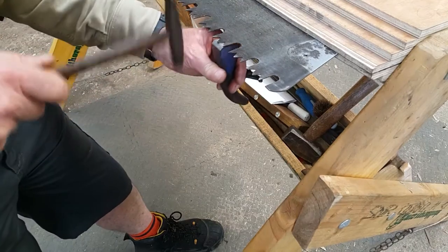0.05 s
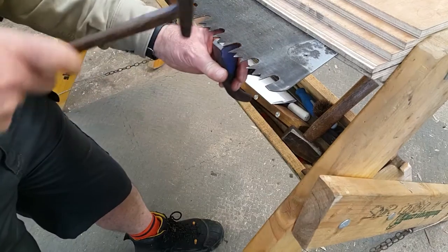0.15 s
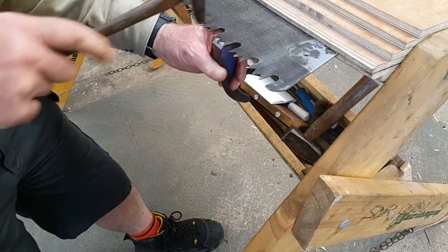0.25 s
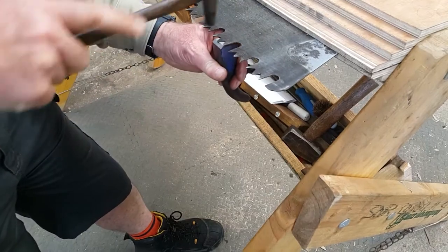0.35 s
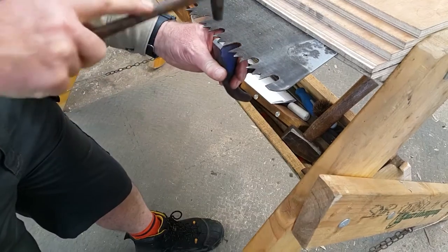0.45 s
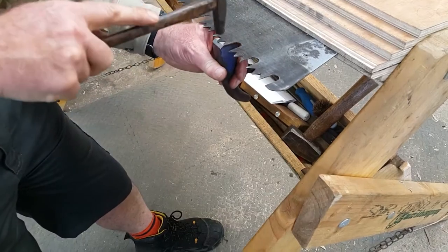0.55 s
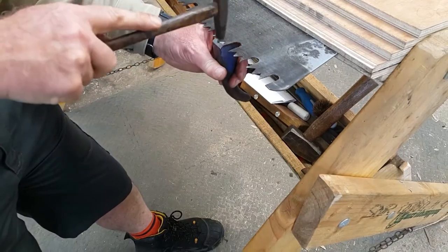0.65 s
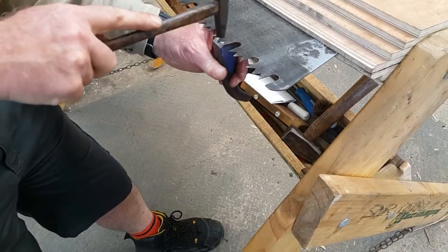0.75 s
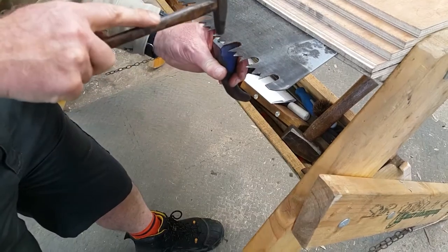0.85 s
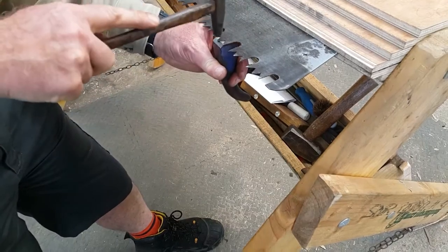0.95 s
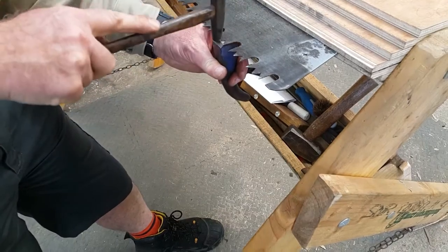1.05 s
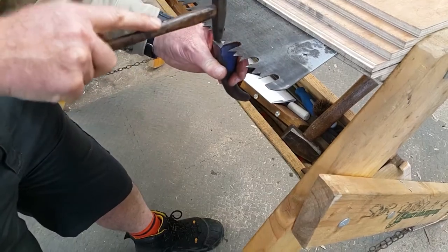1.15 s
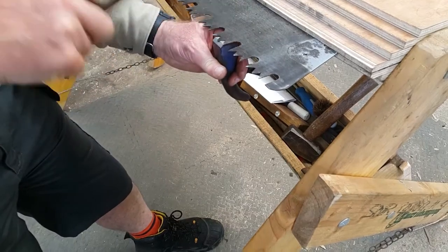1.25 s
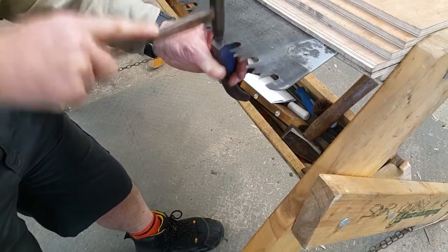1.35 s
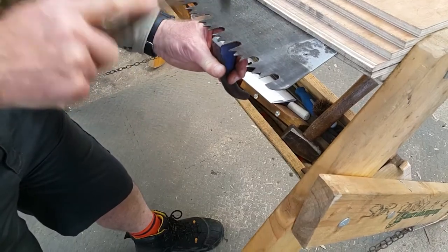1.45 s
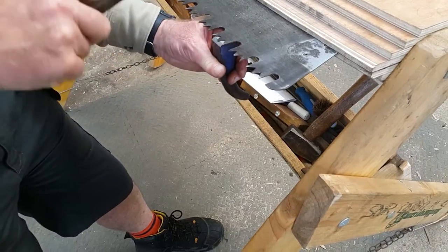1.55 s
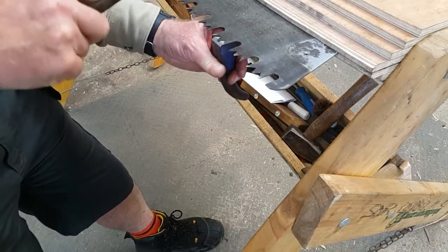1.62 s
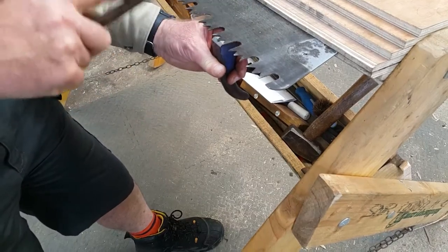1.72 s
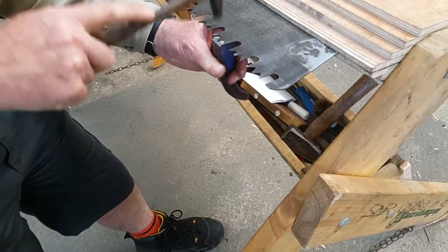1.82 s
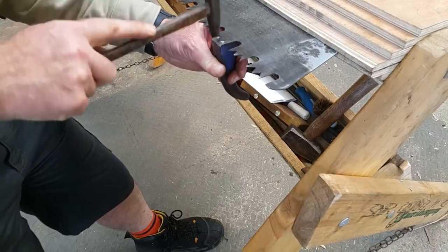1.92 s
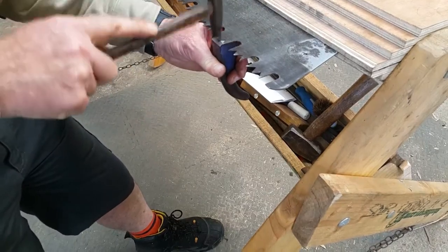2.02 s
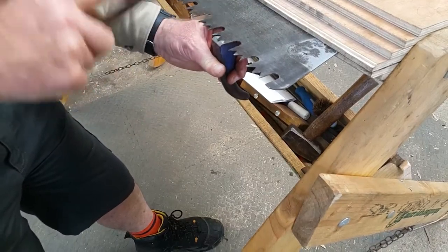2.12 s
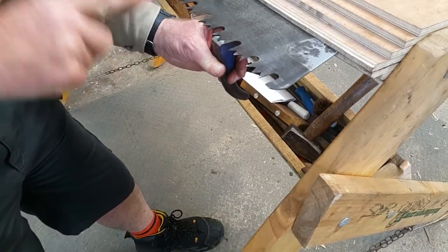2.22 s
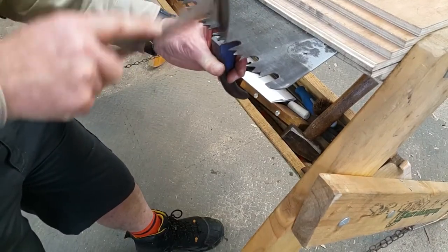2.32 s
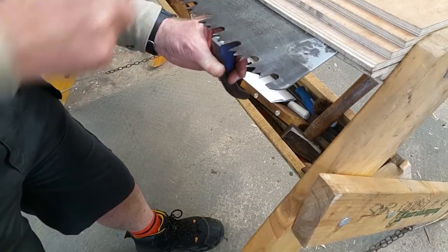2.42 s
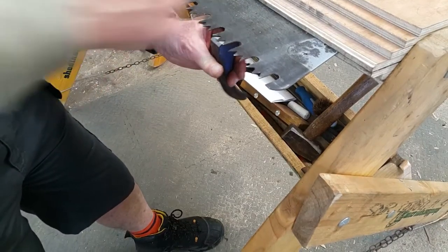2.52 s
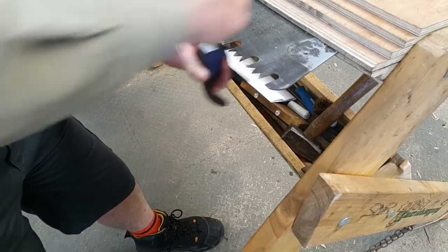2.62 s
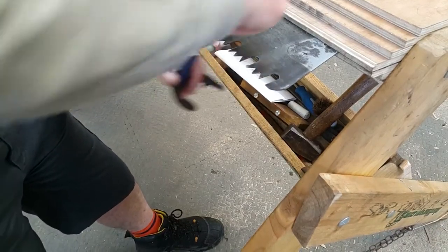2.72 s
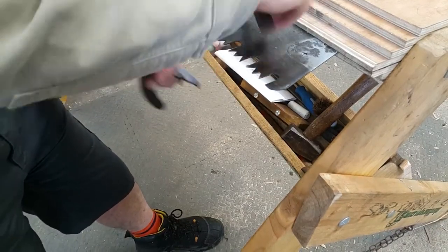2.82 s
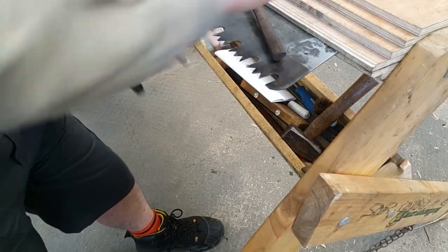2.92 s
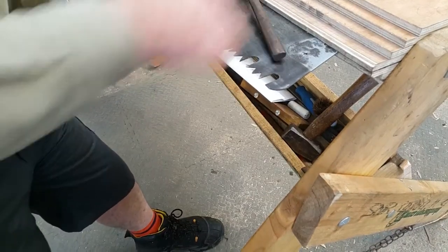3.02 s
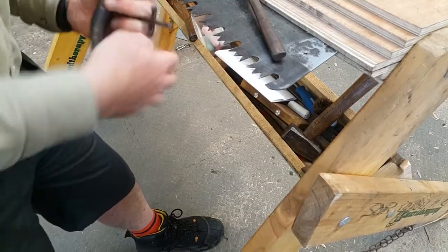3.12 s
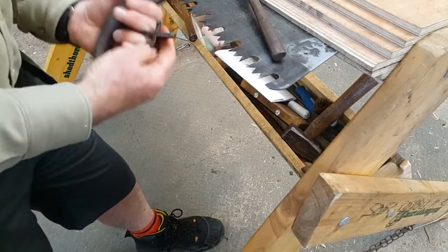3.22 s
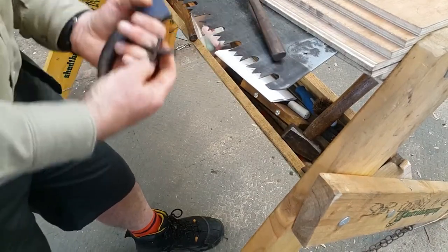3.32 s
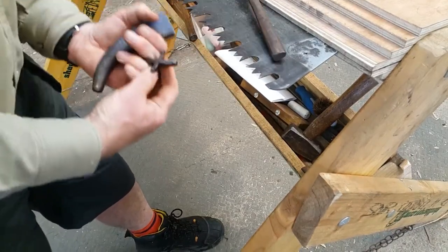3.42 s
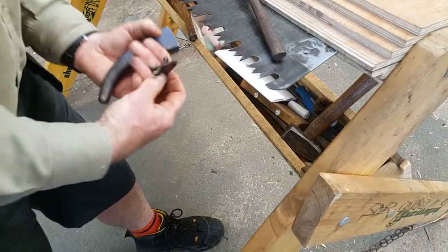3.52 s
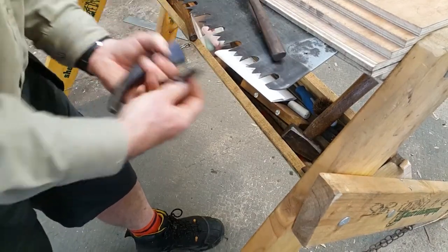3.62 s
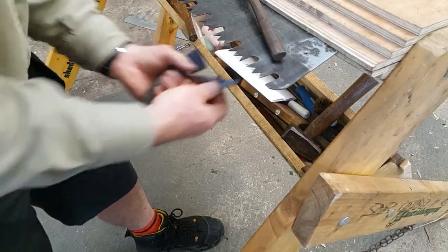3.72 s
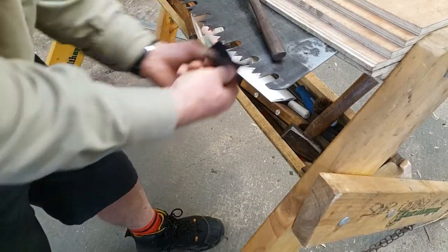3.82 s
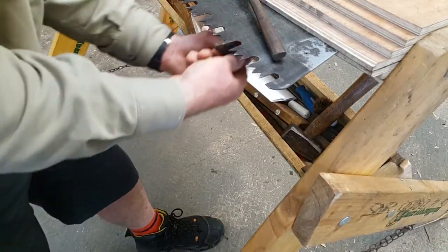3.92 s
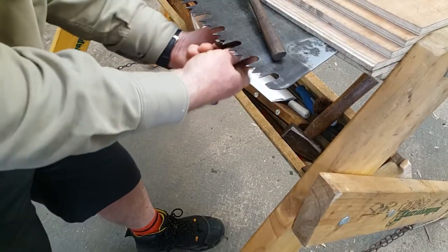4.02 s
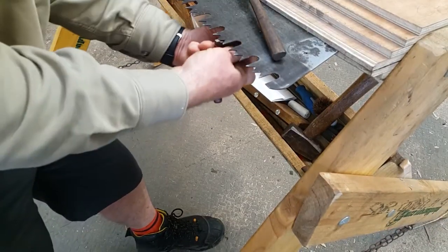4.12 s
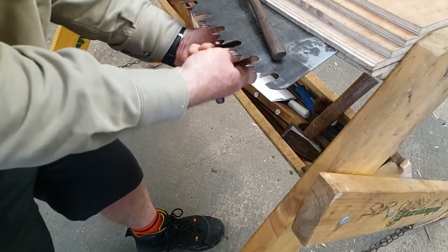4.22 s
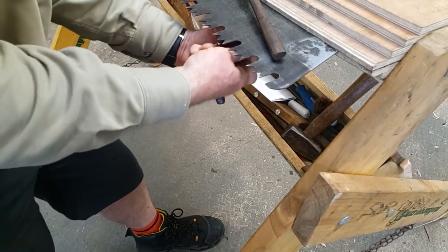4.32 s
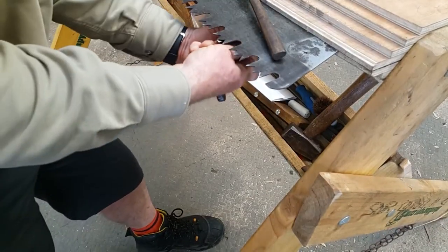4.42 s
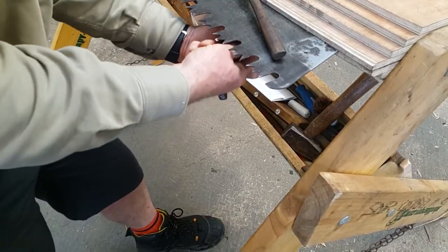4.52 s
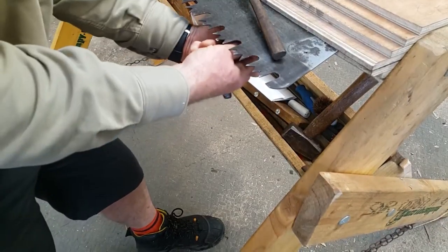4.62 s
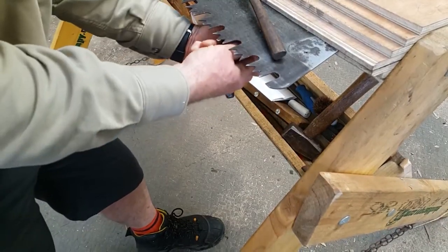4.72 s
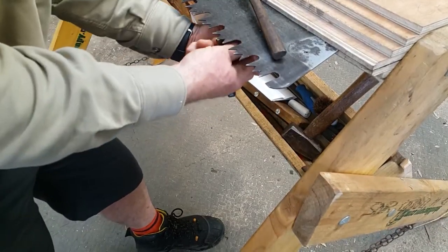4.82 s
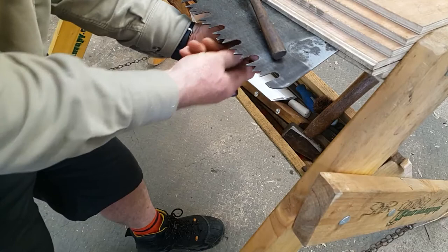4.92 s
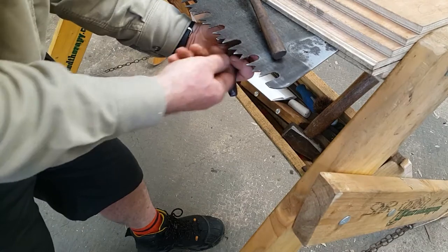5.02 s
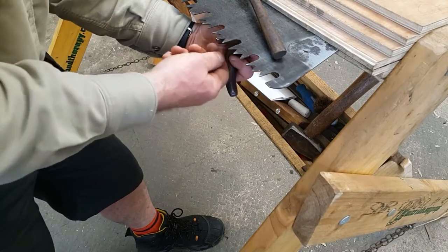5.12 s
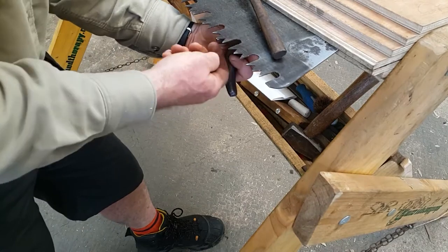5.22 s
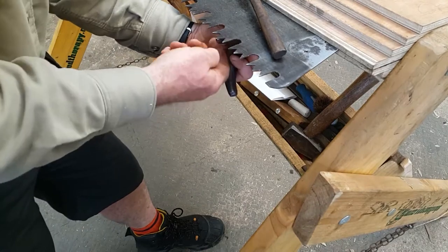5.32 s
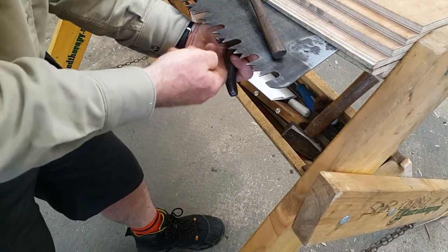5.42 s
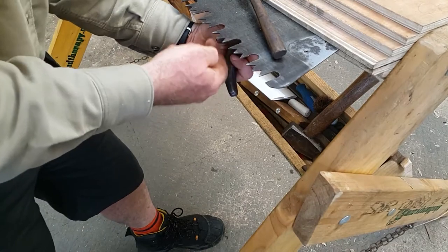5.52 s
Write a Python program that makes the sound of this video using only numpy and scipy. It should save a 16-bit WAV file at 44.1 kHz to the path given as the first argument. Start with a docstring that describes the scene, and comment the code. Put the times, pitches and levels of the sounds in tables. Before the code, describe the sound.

A hammer gives a saw tooth two light taps and two hard ringing blows, then is laid down with a metallic clatter.

```python
"""Setting saw teeth in a workshop

Close to a small anvil, on a phone's two microphones: twice a light aiming tap, then a hard hammer blow.
Steel cracks, the anvil, blade and bench ring, the room answers, and gain control ducks each hard blow.
The hammer is laid down on the blade and a small steel gauge clicks against a tooth; sleeves rustle."""
import sys
import numpy as np
from scipy import signal
from scipy.fft import rfft, irfft, next_fast_len
from scipy.io import wavfile
from scipy.ndimage import uniform_filter1d, minimum_filter1d

SR = 44100
rng = np.random.default_rng(int(sys.argv[2]) if len(sys.argv) > 2 else 0)


def waveform_to_disk(signal):
    """Save audio, clipped to [-1, 1], as 16-bit WAV at the path in sys.argv[1]."""
    frames = np.transpose(np.atleast_2d(signal))
    scaled = np.clip(frames, -1, 1) * 32767
    samples = np.round(scaled).astype(np.int16)
    wavfile.write(sys.argv[1], SR, samples)


N = 245107
T = np.arange(N) / SR
SIDES = np.array([[1], [-1]])  # left and right microphone


# taps and blows at the anvil: (time [s], force [dB], firmness of the tooth's seat [dB])
HAMMER_BLOWS = [(1.1673, 1.5, 1), (1.5117, 33.5, 8), (2.1192, -6, 2), (2.4257, 36.5, -4)]
# a blow's tone hardens with force: (frequency [Hz], level at 0 dB force [dB], growth [dB/dB])
HAMMER_TONE = [(450, 14.5, -0.4077), (1507, 3.5, -0.17), (3517, -1, 0.04), (6030, -2, 0.1478),
               (11000, -5.5, 0.2536)]
# ring of anvil, blade and bench, a row each: (level at 0 dB force [dB], growth [dB/dB])
HAMMER_RINGS = [(-51.5, 1.3853), (-41.5, 0.7888), (-27.5, 0.434)]
# a firmly seated tooth passes the blow on as a thump: (frequency [Hz], lift [dB/dB of seat])
SEAT_THUMP = [(160, 1), (900, 0)]
def hammer_blows(plate, shimmer_db=-5.0):
    """Hammer on tooth: force brightens it and brings out the anvil; a firm seat adds thump and ring."""
    out = np.zeros((2, N))
    for s, force_db, seat_db in HAMMER_BLOWS:
        tone = [(hz, db + growth * force_db) for hz, db, growth in HAMMER_TONE]
        crack = tilt(contact(force_db, tone, t60=0.0097), SEAT_THUMP, seat_db)
        anvil_db, blade_db, bench_db = (db + growth * force_db for db, growth in HAMMER_RINGS)
        rings_db = [anvil_db + seat_db, blade_db, bench_db]
        add(out, s, strike(s, crack, rings_db, undb(shimmer_db) * plate, wet_db=0.07, ring_wet_db=-16.5))
    return out


# hammer clatter and gauge clicks on the saw: (time [s], force [dB], dullness [dB], sharpness [dB])
TOOL_KNOCKS = [(0.2286, -14.5, 19, 7), (2.8481, 16.5, 11.5, 6), (2.861, 7.5, 11, 0), (2.8772, 8.5, 16.5, 0),
               (2.9530, 8.5, 16.5, -2.5), (3.036, 11, 5, -5.5), (4.5950, -2.5, 0, 0),
               (4.7660, -19, 18.5, 7)]
# tone of a knock: (frequency [Hz], level [dB])
TOOL_TONE = [(200, -4), (480, 1.5), (750, -1.5), (1500, 0), (3200, -1), (5600, 6), (11000, 1)]
# ring relative to a knock's force: (anvil [dB], blade [dB], bench [dB])
TOOL_RINGS = [-62, -50, -59.5]
# a softer contact leans towards the bass: (frequency [Hz], lift [dB/dB of dullness])
DULL_BASS = [(500, 1), (1500, 0.52), (3600, 0)]
# a sharp edge adds a high tick: (frequency [Hz], lift [dB/dB of sharpness])
EDGE_TICK = [(6200, 0), (11000, 1)]
def tool_knocks(plate, shimmer_db=-14):
    """Tools knock on the saw: mostly crack, with a little ring; a dull knock shakes the bench more."""
    out = np.zeros((2, N))
    for s, force_db, dull_db, edge_db in TOOL_KNOCKS:
        crack = tilt(contact(force_db, TOOL_TONE, t60=0.013), DULL_BASS, dull_db)
        crack = tilt(crack, EDGE_TICK, edge_db)
        anvil_db, blade_db, bench_db = force_db + np.array(TOOL_RINGS)
        rings_db = [anvil_db, blade_db, bench_db + dull_db]
        add(out, s, strike(s, crack, rings_db, undb(shimmer_db) * plate, wet_db=-2.5, ring_wet_db=-2.5))
    return out


# steel meeting steel, heard close: (frequency [Hz], level [dB])
STEEL_SPECTRUM = [(40, -34), (130, -17.5), (220, -9.5), (330, -6.5), (700, 0.5), (1200, 5), (2000, 5),
                  (3300, 3), (5500, 3.5), (7800, 1.5), (9000, -8.5), (11500, -9), (13500, -22),
                  (16000, -21.5)]
def contact(force_db, tone, t60, rise_t60=0.012, evenness=0.22, size=4096):
    """The crack of steel on steel: a burst that dies quickly, spread unevenly over all pitches."""
    t = T[:size]
    spectrum = rfft(diffuse(size) * fade(t, t60) * (1 - fade(t, rise_t60)))
    burst = irfft(spectrum / np.abs(spectrum) ** evenness) * fade(t, 3 * t60)
    burst /= np.sqrt(np.sum(burst ** 2, axis=1, keepdims=True))
    return undb(force_db) * colour(colour(burst, STEEL_SPECTRUM), tone)


# modes of the anvil, the saw blade and the bench: (frequency [Hz], level [dB], t60 [s])
ANVIL_MODES = [(3461, -18, .3), (4047, -15, .3), (4254, -9, .33), (4391, -5, .34), (4406, -1, .17),
               (5180, -12, .27), (5437, -12, .3), (6114, -14, .28), (7323, -15, .25), (7996, -10, .42),
               (8032, -10, .42), (10130, -24, .3), (11050, -12, .3)]
BLADE_MODES = [(1010, -17, 1.4), (1198, -1, 5.0), (1364, -3, .6), (1779, -2, .5), (2045, -3, .35),
               (2428, -9, .5), (2858, -6, .4), (2995, -6, .4)]
BENCH_MODES = [(287, -6, .3), (303, -6, .28), (330, -6, .25), (393, -3, .36), (432, -3, .34), (470, -7, .3),
               (548, -8, .22), (587, -12, .33), (651, -9, .22), (885, -10, .42), (921, -6, .46),
               (961, -6, .52), (1028, -13, .45), (1120, -10, .3)]
# thin steel sends little bass straight to the microphones: (frequency [Hz], level [dB])
DIRECT_PATH = [(120, -38), (400, 1.5), (1000, -5), (3500, 1.5), (6000, 5.5), (12000, -1)]
def strike(s, crack, rings_db, plate, wet_db, ring_wet_db):
    """One contact from close by: its crack, the ring of anvil, blade and bench, then the room."""
    anvil, blade, bench = undb(rings_db)
    close = blade * ring(BLADE_MODES, SR) * grip(s, SR)
    add(close, 0, anvil * ring(ANVIL_MODES, SR // 2) + bench * ring(BENCH_MODES, SR // 2))
    into_room = undb(ring_wet_db) * close
    add(into_room, 0, undb(wet_db) * crack)
    direct = colour(crack, DIRECT_PATH)
    add(close, 0, direct)
    add(close, 0, undb(wet_db) * signal.fftconvolve(direct, echoes(), axes=1))
    add(close, 0, signal.fftconvolve(crack, plate, axes=1))
    sound = signal.fftconvolve(into_room, room(), axes=1)
    add(sound, 0, close)
    return sound


def ring(modes, size):
    """Struck modes die away; the higher ones reach the two microphones out of step."""
    t, out = T[:size], 0
    for hz, db, t60 in modes:
        skew = SIDES * min(hz / 2000, 1) * rng.uniform(-0.35, 1) * np.pi / 2
        phase = 2 * np.pi * (hz * t + rng.random()) + skew
        out = out + undb(db) * fade(t, t60) * np.sin(phase)
    return out * (1 - fade(t, 0.018))


def shimmer(count=320, t60=0.27, spread_db=4):
    """The blade's many high bending modes, evenly dense as in any thin plate."""
    modes = [(1500 + 10500 * pitch, spread_db * (2 * level - 1), t60 * (.6 + .8 * decay))
             for pitch, level, decay in rng.random((count, 3))]
    return unit_energy(ring(modes, SR // 2))


# the blade's ring sinks once and swells back: (time [s], level [dB])
BLADE_SWELL = [(3.1, -1.5), (3.32, -6.5), (3.42, -1), (3.68, 1), (3.9, -1.5)]
def grip(s, size, damping_db_per_s=79, let_go_s=3.25, take_hold_s=3.91):
    """Gain of the blade's ring from time s: the hand damps it, except while it has let go."""
    t = s + T[:size]
    held_s = t - np.clip(t, let_go_s, take_hold_s)
    swell_db = np.interp(t, *np.transpose(BLADE_SWELL))
    return undb(swell_db - damping_db_per_s * (held_s - held_s[0]))


# fingers and tools on the blade: (time [s], force [dB], dullness [dB], nominal t60 [s])
LIGHT_TOUCHES = [(0.1490, -39.5, 26.5, 0.012), (0.272, -24.5, 17, 0.023), (4.151, -33, 27.5, 0.14),
                 (4.176, -34, 30.5, 0.062), (4.341, -37, 14.5, 0.06), (4.5815, -26, 26.5, 0.027),
                 (4.9, -32.5, 9, 0.045)]
# tone of a touch: (frequency [Hz], level [dB])
TICK_TONE = [(450, -1.5), (1500, -2.5), (3600, -1.5), (8500, 7), (12000, 6)]
def touches():
    """Ticks and scuffs too light to ring the blade, each with the room behind it."""
    out = np.zeros((2, N))
    for s, force_db, dull_db, t60 in LIGHT_TOUCHES:
        tick = tilt(contact(force_db, TICK_TONE, t60), DULL_BASS, dull_db)
        add(out, s, colour(tick, DIRECT_PATH))
        add(out, s, signal.fftconvolve(tick, room(), axes=1))
    return out


# the two microphones differ most in the treble: (frequency [Hz], left minus right [dB])
MIC_BALANCE = [(120, 1.5), (300, 1), (1200, -1.5), (3000, -0.5), (4500, -4.5), (6500, -3), (8500, 10.5),
               (11500, 8.5), (14000, 3.5)]
def metalwork():
    """Blows, knocks and touches, as each microphone colours them."""
    plate = shimmer()
    steel = hammer_blows(plate) + tool_knocks(plate) + touches()
    return np.array([tilt(channel, MIC_BALANCE, side / 2) for channel, side in zip(steel, (1, -1))])


# movements at the bench: (time [s], half-width [s], level [dB])
SLEEVE_SWELLS = [(0.45, 0.13, -57.5), (0.78, 0.29, -68.5), (3.653, 0.059, -60), (3.924, 0.23, -61.5)]
def sleeves(grain_db=1.0):
    """Soft swells of grainy hiss as cloth and skin slide."""
    swell = sum(undb(db) * np.exp(-((T - s) / width) ** 2) for s, width, db in SLEEVE_SWELLS)
    knots = np.arange(0, N, SR // 200)
    grain = undb(grain_db * np.interp(np.arange(N), knots, rng.standard_normal(len(knots))))
    cloth_tone = [(100, 0), (500, 4.0), (1500, -4.0), (4000, -1.5), (7000, 7.0), (9500, -7), (15000, -15)]
    hiss = colour(diffuse(N), cloth_tone)
    return swell * grain * hiss / hiss.std()


# off the bench top, the floor and the near wall: (delay [s], relative level [dB])
NEAR_ECHOES = [(.0048, -4.5), (0.014, -21.5), (.026, -21.5)]
def echoes(size=2048):
    """Single reflections, each reaching the two microphones at slightly different moments."""
    out = np.zeros((2, size))
    for delay, db in NEAR_ECHOES:
        arrival = (SR * (delay + rng.uniform(0, .0004, 2))).astype(int)
        out[[0, 1], arrival] += undb(db)
    return out


# reverberation of the workshop's walls: (frequency [Hz], t60 [s])
WALL_DECAY = [(100, 0.28), (400, 0.41), (1200, 0.34), (3000, 0.45), (6000, 0.37), (10000, 0.25),
              (15000, 0.15)]
def room(near_db=-5, near_t60=0.014, walls_db=-1, build_t60=0.048, far_db=-23, far_t60=0.73, size=SR):
    """Echo pattern of one spot: bench and floor first, then the walls, then a faint long tail."""
    t, hz = T[:size], np.fft.rfftfreq(size, 1 / SR)
    noise, walls = rfft(diffuse(size)), 0
    for band_hz, t60 in WALL_DECAY:
        band = curve([(f, f == band_hz) for f, _ in WALL_DECAY], hz)
        walls = walls + irfft(noise * band, size) * fade(t, t60)
    walls = walls * (1 - fade(t, build_t60))
    near = diffuse(size) * fade(t, near_t60) * (t > .003)
    far = colour(diffuse(size), [(2000, -5.5), (6000, -8.0), (11000, -19)]) * fade(t, far_t60)
    return sum(undb(db) * unit_energy(x) for db, x in [(near_db, near), (walls_db, walls), (far_db, far)])


# room tone all around the microphones: (frequency [Hz], relative level [dB])
AIR_SPECTRUM = [(30, -21), (90, -13.5), (200, -13.5), (280, -8), (600, -13), (655, -1.5), (710, -13),
                (1000, -18), (3700, -23), (4800, -20), (5750, -8.5), (8000, -25), (11000, -26.5),
                (16000, -29)]
def room_tone(level_db=-60.5):
    """The steady air of the workshop: a low murmur with a hum and a band of hiss."""
    air = colour(diffuse(N, alike_hz=600, likeness=0.17), AIR_SPECTRUM)
    return undb(level_db) * air / air.std()


def diffuse(size, alike_hz=750, likeness=1.0):
    """White noise at two closely spaced microphones: alike in the bass, unrelated in the treble."""
    mid, side = rfft(rng.standard_normal((2, size)))
    alike = likeness / (1 + (np.fft.rfftfreq(size, 1 / SR) / alike_hz) ** 2)
    return irfft(mid * np.sqrt(1 + alike) + SIDES * side * np.sqrt(1 - alike), size) / np.sqrt(2)


def undb(db):
    """Decibels to gain."""
    return 10 ** (np.asarray(db) / 20)


def curve(points, hz):
    """Read (Hz, value) points on a log-frequency axis."""
    f, value = np.transpose(points)
    return np.interp(np.log(np.maximum(hz, 1)), np.log(f), value)


def colour(x, points):
    """Minimum-phase filter with the given (Hz, dB) response."""
    n = 2 * next_fast_len(x.shape[-1])
    gain = undb(curve(points, np.fft.rfftfreq(n, 1 / SR)))
    cepstrum = irfft(np.log(gain))
    cepstrum[1:n // 2] *= 2
    cepstrum[n // 2 + 1:] = 0
    return irfft(rfft(x, n) * np.exp(rfft(cepstrum)))[..., :x.shape[-1]]


def tilt(x, shape, amount):
    """Colour x with a (Hz, dB) shape scaled by amount."""
    return colour(x, [(hz, amount * db) for hz, db in shape])


def fade(t, t60):
    """Exponential decay, 60 dB down after t60."""
    return np.exp(-np.log(1000) * t / t60)


def unit_energy(x):
    """Scale a pair so that its left channel has unit energy."""
    return x / np.sqrt(np.sum(x[0] ** 2))


def add(out, s, x):
    """Mix x into out from time s."""
    i = int(s * SR)
    out[:, i:i + x.shape[1]] += x[:, :N - i]


def scene():
    """Metalwork and sleeves up close, room tone behind."""
    return metalwork() + sleeves() + room_tone()


def limit(x, ceiling_db, ahead_s, release_db_per_s):
    """Look-ahead gain control: sinks just before a peak above the ceiling, then recovers steadily."""
    peak_db = 20 * np.log10(np.abs(x).max(axis=0) + 1e-9)
    over_db = np.maximum(peak_db - ceiling_db, 0)
    cut_db = np.maximum.accumulate(over_db + release_db_per_s * T) - release_db_per_s * T
    n = 2 * int(ahead_s * SR / 2) + 1
    held_db = -minimum_filter1d(-cut_db, n, origin=-(n // 2))
    return x * undb(-uniform_filter1d(held_db, n, origin=n // 2))


def record(dry, top_hz=15900):
    """The phone: slow gain control, a fast limiter, rounded peaks and a steep cut of the top."""
    ducked = limit(dry, ceiling_db=7.0, ahead_s=.035, release_db_per_s=27)
    limited = limit(ducked, ceiling_db=1.5, ahead_s=.001, release_db_per_s=294.5)
    lowpass = signal.ellip(8, .2, 70, top_hz, fs=SR, output="sos")
    return signal.sosfilt(lowpass, np.tanh(limited))


dry = scene()
out = record(dry)
waveform_to_disk(out)
```